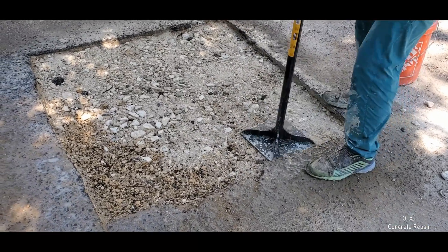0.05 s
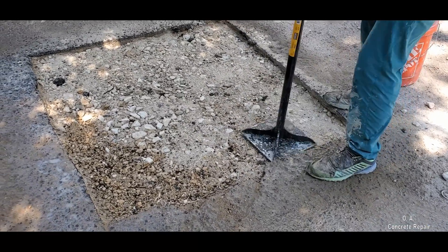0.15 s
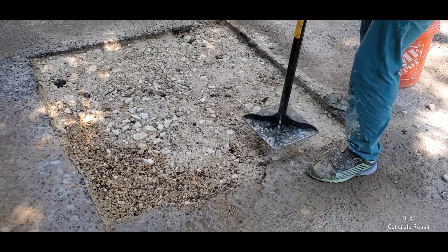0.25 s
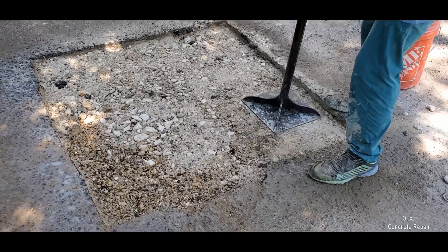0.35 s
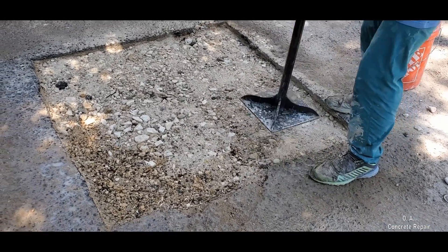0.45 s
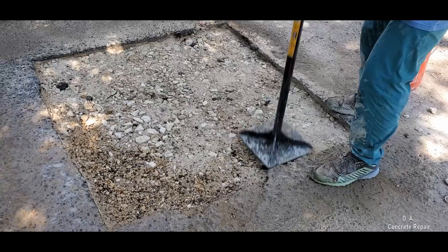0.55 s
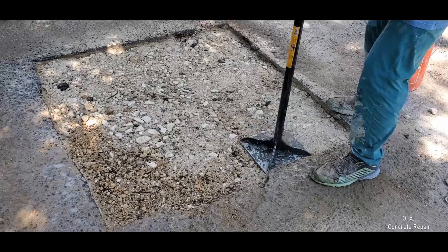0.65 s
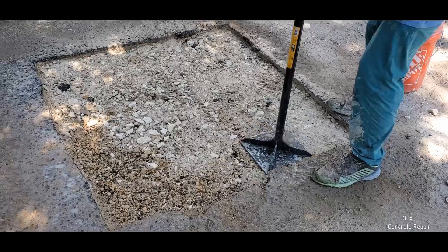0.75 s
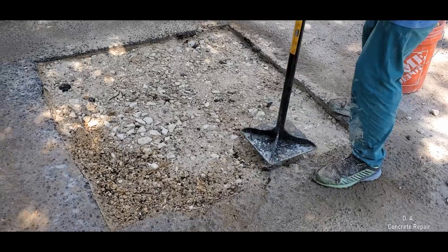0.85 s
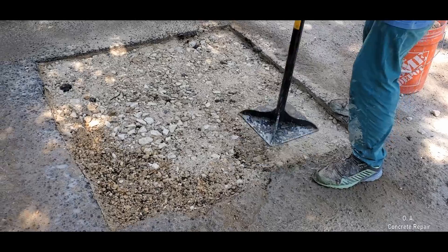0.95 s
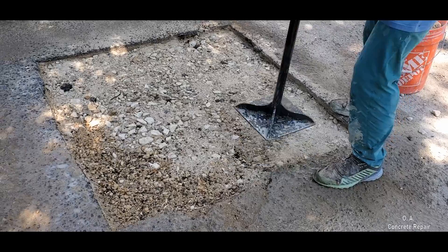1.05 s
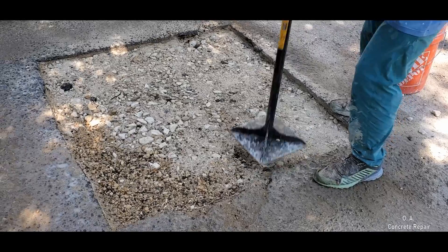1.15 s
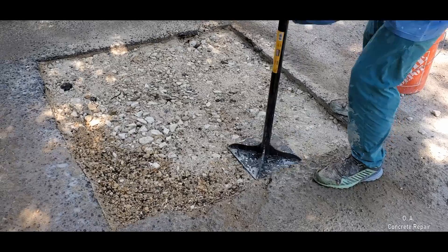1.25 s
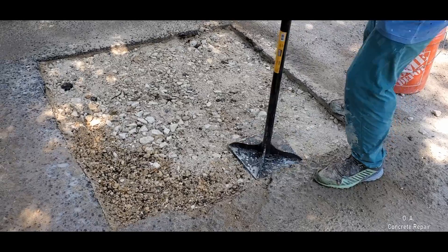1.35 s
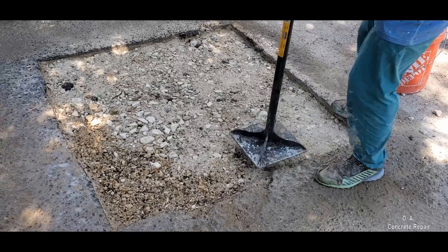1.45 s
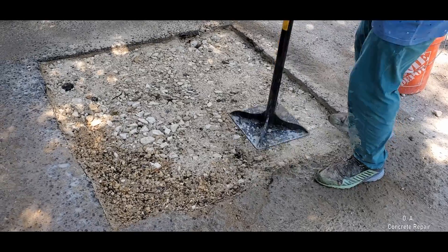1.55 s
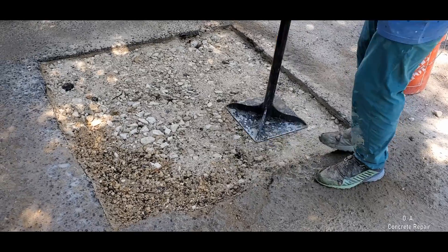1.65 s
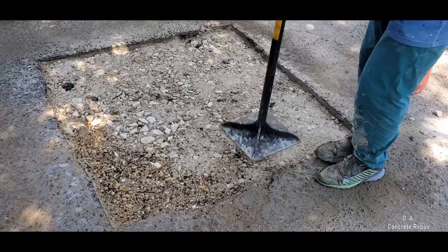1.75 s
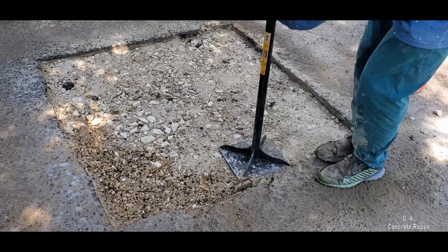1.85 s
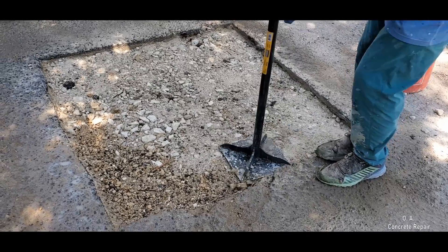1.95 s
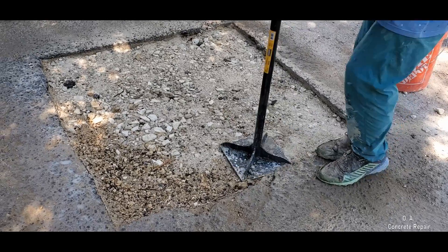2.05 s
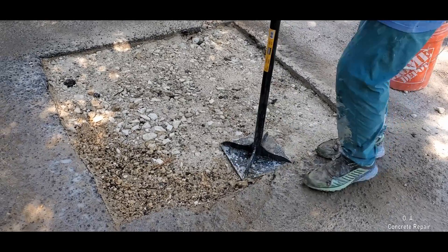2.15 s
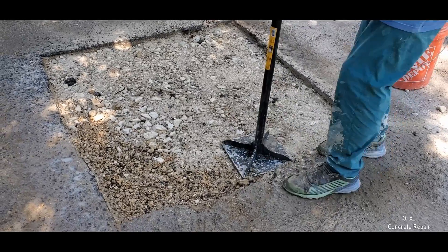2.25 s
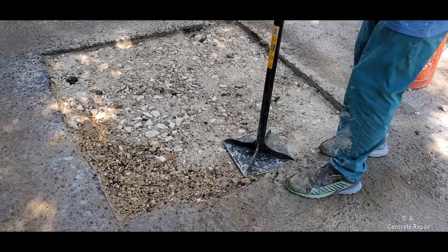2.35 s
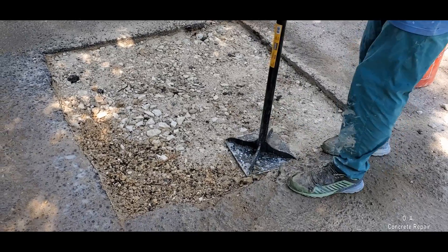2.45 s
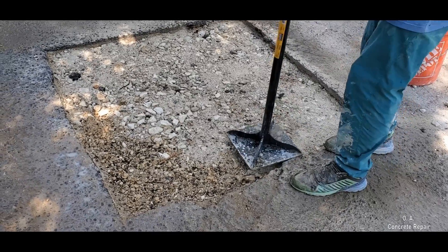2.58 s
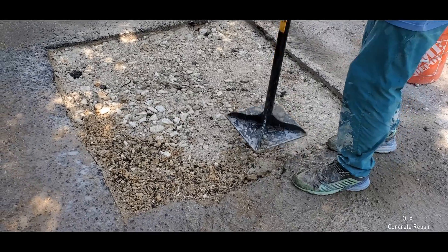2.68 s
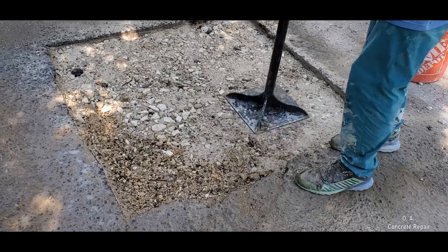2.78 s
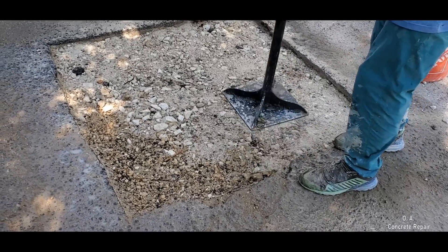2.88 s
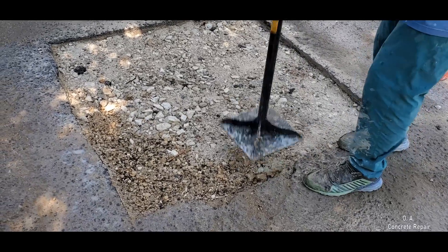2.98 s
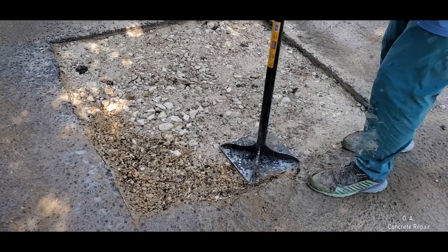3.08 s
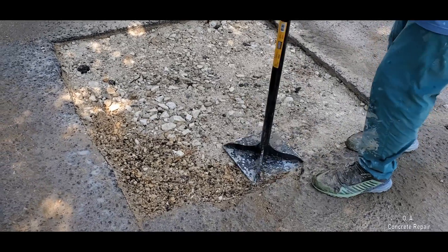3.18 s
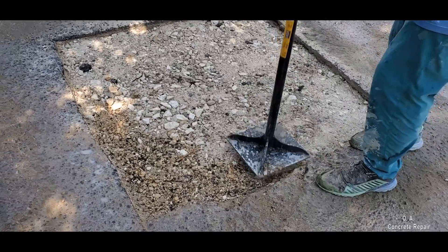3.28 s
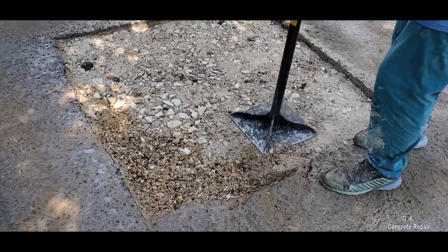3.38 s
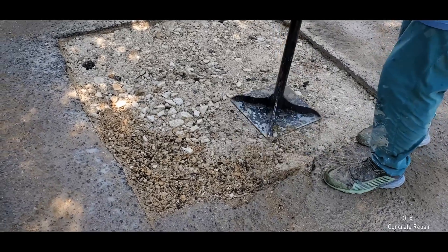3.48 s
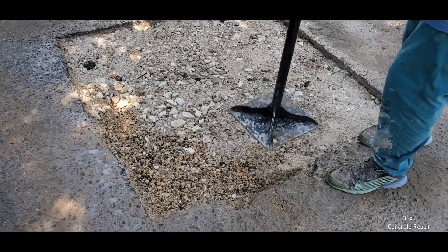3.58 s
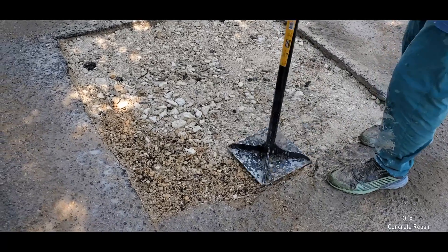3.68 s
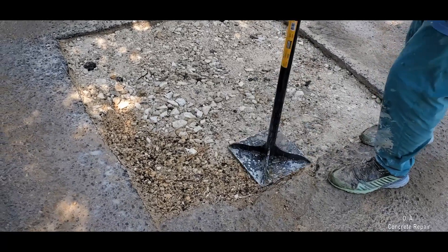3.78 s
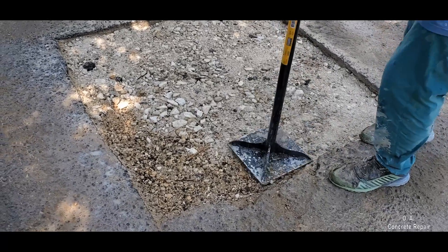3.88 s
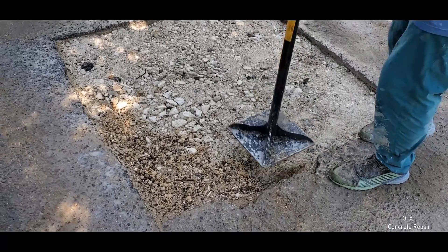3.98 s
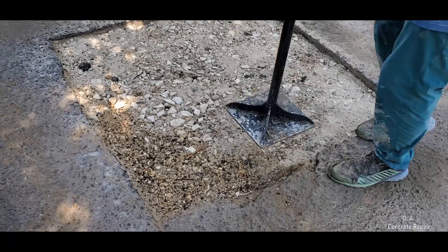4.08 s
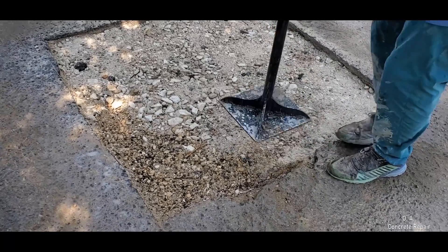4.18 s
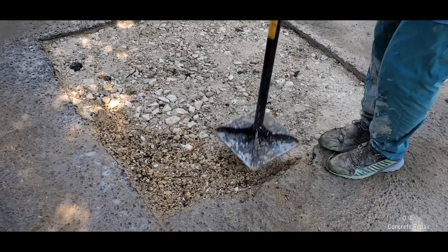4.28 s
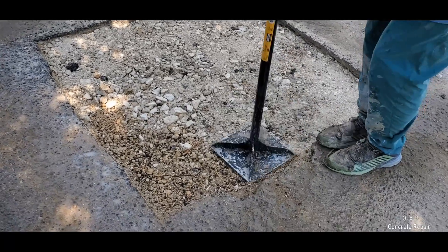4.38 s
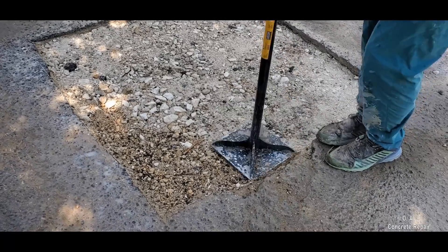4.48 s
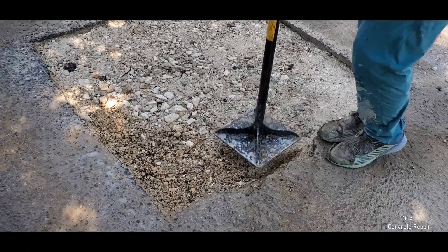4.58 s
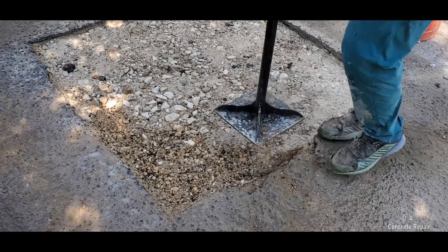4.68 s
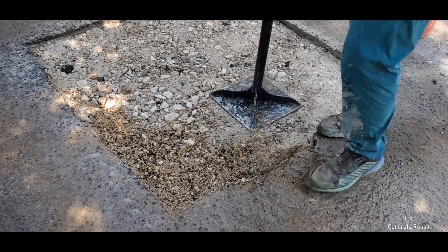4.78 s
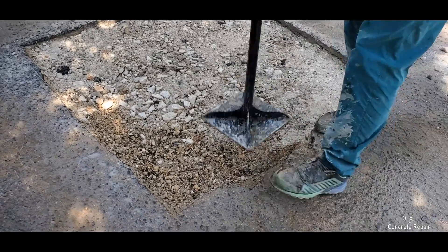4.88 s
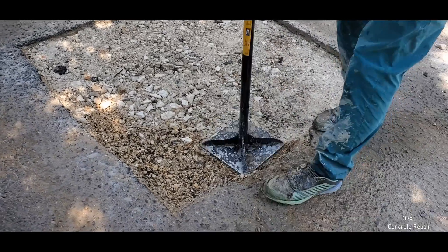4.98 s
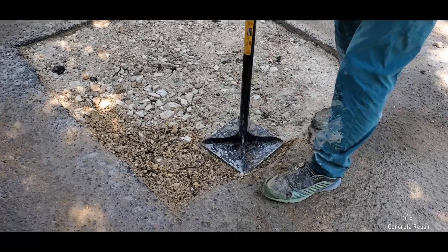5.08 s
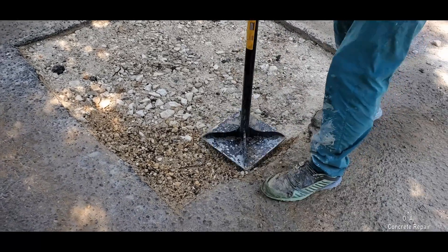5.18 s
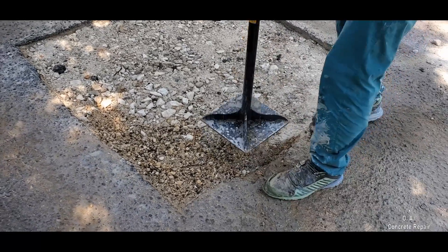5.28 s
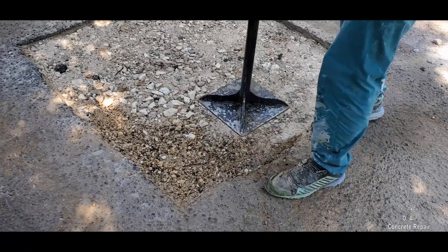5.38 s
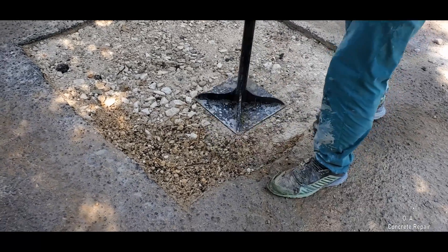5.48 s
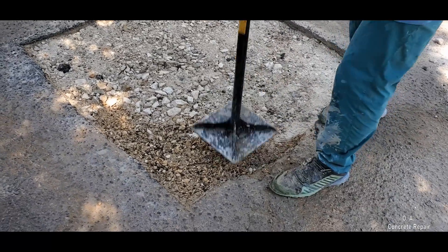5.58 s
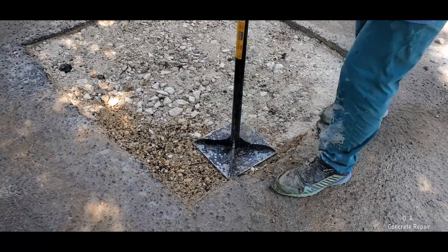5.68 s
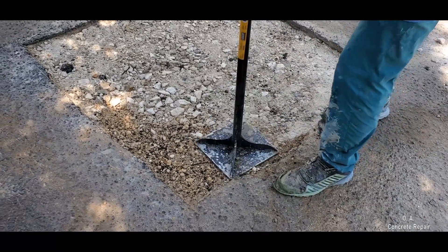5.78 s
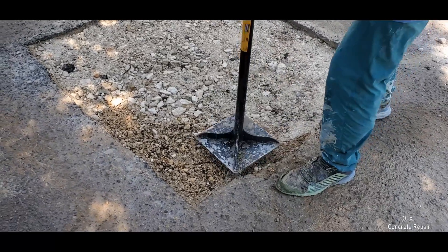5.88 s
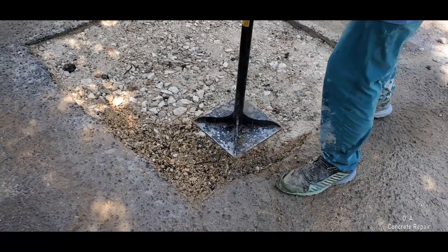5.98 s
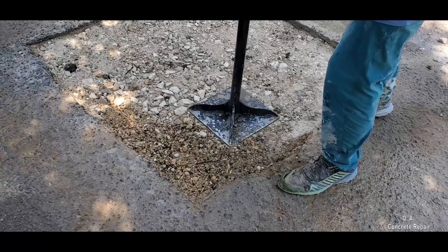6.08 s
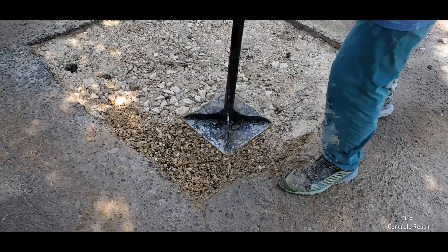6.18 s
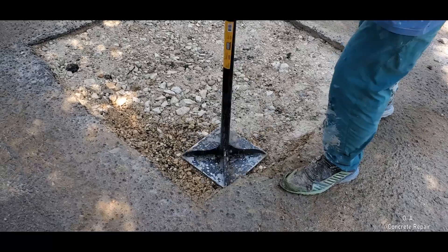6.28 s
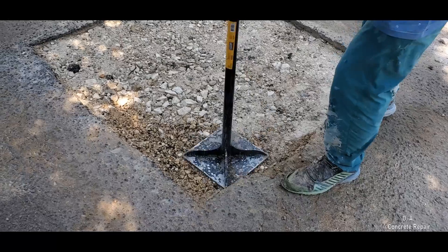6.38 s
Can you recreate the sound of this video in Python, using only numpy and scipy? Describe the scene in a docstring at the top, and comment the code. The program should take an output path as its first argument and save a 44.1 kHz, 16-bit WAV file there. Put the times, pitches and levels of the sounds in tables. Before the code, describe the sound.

A heavy flat steel plate pounds a gravel bed, heard close in stereo. Four regular blows come first, then a longer gap with small shoe crunches, then six more at the same pace. The hits are short, dry and stony, with choked steel clinks, hollow knocks and deep thuds; some are followed by a light hop and rattle. House fronts return a brief diffuse echo over a wavering far hum and slowly growing road hiss.

```python
"""A road patch between house fronts: a steel hand tamper pounds damp gravel about two metres from a two-port microphone.
Ten blows with one pause: an edge of the plate clinks (decaying modes), the gravel crunches (grainy noise),
the plate slaps flat (a pressure cusp), the ground thuds and knocks (damped tones), and at times the plate hops.
The house fronts answer each blow (a noise tail); shoes shift on grit in short bursts of grainy noise,
and a distant engine hums in wavering sines over the coloured noise of the outdoor air."""
import sys
import numpy as np
from scipy import signal
from scipy.fft import rfft, irfft, next_fast_len
from scipy.io import wavfile
from scipy.ndimage import uniform_filter1d, minimum_filter1d

SR = 44100
rng = np.random.default_rng(int(sys.argv[2]) if len(sys.argv) > 2 else 0)


def pcm_store(signal):
    """Save signal as 16-bit PCM."""
    levels = np.round(np.clip(np.atleast_2d(signal), -1, 1) * 32767)
    wavfile.write(sys.argv[1], SR, levels.astype(np.int16).T)


N = 284004
T = np.arange(N) / SR  # t/s
LEAD = int(.06 * SR)  # samples kept ahead of a contact
AGE = (np.arange(SR // 2) - LEAD) / SR  # time around one contact, t/s

# The ten landings of the flat plate: t/s, lead of its first edge/s, slap level/dB, thud level/dB, knock level/dB,
# crunch level/dB, steel level/dB, ring length relative to the modes' t60, favoured mode f/Hz, echo level/dB
BLOWS = [ (.071, 0.0028, -17.5, -30, -23, -25.5, -27.5, 0.25, 3670, 2.5),
         (0.6913, 0.0035, -27, -25, -23, -24, -27, 0.48, 3820, -1),
         (1.307, 0.0023, -15, -26, -19, -25.5, -25, 0.17, 4780, -1.5),
         (1.9287, 0.011, -38.5, -35.5, -32, -23.5, -24, 1.02, 3500, -5.5),
         (3.1404, 0.0095, -18.5, -22, -17, -25, -27, 0.68, 3640, -3.5),
         (3.783, 0.0018, -18, -22, -23, -28, -43, 2.17, 4155, -0.5),
         (4.4282, 0.0018, -41, -22.5, -25, -25, -37.5, 1.56, 4110, 0),
         (5.0845, 0.0014, -20, -24.5, -22, -29, -36.5, 0.19, 6240, 3),
         (5.7597, 0.0034, -17, -16, -23.5, -24.5, -35.5, 0.99, 4155, -7.5),
         (6.4089, 0.0029, -17.5, -17, -30, -23.5, -38.5, 0.95, 1052, 0)]
SLAP_S = 0.00088  # time the air takes to escape from under the plate
THUD_HZ, PACKING_HZ_PER_S, THUD_DELAY_S = 71.4, 1.3, .01  # pitch at t = 0; the bed stiffens as it is packed
CRUNCH_AHEAD_S = 0.0014  # added to the edge's lead when the crunch is timed
FAR_EDGE_DB, FAR_EDGE_HZ = -13.5, 620  # the far edge follows with a softer, lower clank
FAVOUR_DB = 7.5
APART_HZ, APART_LOW_DB = 4000, -11.5  # above this each port hears its own share of the cracking stones


def tamper():
    """One edge clinks, the far edge follows as the plate lands flat; each spot gives a slightly different echo."""
    near, apart, echo = np.zeros(N), np.zeros(N), np.zeros((2, N))
    for s, lead, slap_db, thud_db, knock_db, crunch_db, steel_db, ring, favoured_hz, echo_db in BLOWS:
        blow, steel = np.zeros(N), np.zeros(N)
        stones, stones_left = (undb(crunch_db) * crisp(crunch(lead + CRUNCH_AHEAD_S), s) for _ in range(2))
        ground = undb(thud_db) * thud(THUD_HZ + PACKING_HZ_PER_S * s, THUD_DELAY_S)
        add(blow, s, undb(slap_db) * slap(SLAP_S) + ground)
        add(blow, s, undb(knock_db) * knock() + stones)
        # stones crack all across the plate, so the treble of the crunch differs left and right
        add(apart, s, colour(stones_left - stones, [(1000, APART_LOW_DB), (APART_HZ, 0)]))
        add(steel, s - lead, strike(steel_db, ring, favoured_hz, FAVOUR_DB))
        add(steel, s - .15 * lead, strike(steel_db + FAR_EDGE_DB, ring, FAR_EDGE_HZ, favour_db=18))
        near += blow + steel
        # the flat plate sends most of its ring upward, little toward the houses
        echo += undb(echo_db) * street(blow + .25 * steel)
    return ports(near, apart) + echo


def slap(width, rebound=0.57):
    """Air squeezed from under the plate: pressure climbs to a cusp, then swings negative as the plate stops."""
    return swell(AGE, width, 0.9 * width) - rebound * np.exp(-(AGE / width - 2) ** 2)


def thud(hz, delay, cycles=0.54):
    """Plate and packed ground bounce together for a few cycles, with a crest at the delay."""
    turn = (AGE - delay) * hz
    growth = np.maximum(turn + 0.7, 0) / (1.42 * cycles)
    envelope = growth ** 2 * np.exp(2 - 2 * growth)
    return envelope * np.cos(2 * np.pi * turn)


# Modes of the packed bed under the plate, before the detuning at each spot: f/Hz, level/dB, t60/s
BED_MODES = [(182.3, -18, 0.087), (262, -8, 0.043), (376, -15, 0.046), (578, -8, 0.023), (701, -2.5, 0.025),
             (850, -14.5, 0.015)]


def knock(detune=0.066):
    """The packed bed of stones gives a short hollow knock, a little different at each spot."""
    hz, db, t60 = np.transpose(BED_MODES)[:, :, None]
    hz = hz * (1 + detune * rng.standard_normal(hz.shape))
    waves = np.cos(2 * np.pi * hz * AGE)
    return (undb(db) * waves * swell(AGE, 0.00024, t60 / np.log(1000))).sum(0)


# Colour of the cracking stones: f/Hz, level/dB
CRACK_COLOUR = [(300, 1), (900, -4.5), (1500, -2), (2700, -2), (3700, 1.5), (5800, -5), (7300, -7.5),
                (10500, -8), (14000, -16), (16000, -26)]


def crunch(lead, settle_db=-14, settle_s=0.044):
    """The highest stones crack first, the whole bed gives way at the landing, then loose stones settle."""
    # the first cracks come at most 7 ms ahead of the landing
    touch = np.clip(1 + AGE / min(1.6 * lead, .007), 0, 1) ** 2
    after = np.maximum(AGE, 0)
    crush = shaped(colour(cracks(3.97), CRACK_COLOUR), touch * swell(after, 1, 0.0013))
    settle = shaped(colour(cracks(5), CRACK_COLOUR), touch * swell(after, 1, settle_s))
    return crush + undb(settle_db) * settle


# The plate works its way from fine packed grit to coarse loose stones, so the crunch grows brighter
CRISP_DB, CRISP_DB_PER_S = 1.5, 0.98


def crisp(x, s):
    """Treble of the crunch at the spot reached after s seconds."""
    return colour(x, [(4000, 0), (9000, CRISP_DB + CRISP_DB_PER_S * s)])


# A stone that shatters gives a short bright ring, one that holds gives a long dark one
BRIGHT_DB_PER_OCTAVE, DARKER_PER_DOUBLING = 1, 1.9


def strike(db, ring, favoured_hz, favour_db):
    """One clink, the brighter the shorter it rings."""
    ring = max(ring, .05)
    tilt_db = BRIGHT_DB_PER_OCTAVE - DARKER_PER_DOUBLING * np.log2(ring)
    return undb(db) * clink(tilt_db, ring, favoured_hz, favour_db)


# Modes of the plate and its handle, before each strike's tilt and ring length: f/Hz, level/dB, t60/s
PLATE_MODES = [(613, -1, 0.13), (1043, -4.5, 0.18), (1138, -4, 0.13), (1659, -1, 0.041), (2328, 2, 0.06),
               (2540, -26.5, 0.0946), (2680, -18.5, 0.093), (3530, -7.5, 0.17), (3640, -2, 0.043),
               (3467, -7.5, .06), (4107, -7, 0.15), (4180, -33, 0.16), (4893, -6.5, 0.033),
               (5194, -41.5, .03), (6116, -2.5, 0.034), (6350, -18, 0.13), (8060, -5.5, 0.06),
               (10440, -15.5, 0.019)]


def clink(tilt_db, ring, favoured_hz, favour_db):
    """The plate rings most in the mode that the stone lies under; the gravel soon chokes the ring."""
    hz, db, t60 = np.transpose(PLATE_MODES)[:, :, None]
    level_chance, pitch_chance, phase_chance = rng.standard_normal((len(PLATE_MODES), 3)).T[:, :, None]
    favour = np.exp(-(np.log(hz / favoured_hz) / .06) ** 2)
    gain = undb(db + tilt_db * np.log2(hz / 3000) + favour_db * favour + level_chance)
    waves = np.sin(2 * np.pi * (hz * (1 + 0.0025 * pitch_chance) * AGE + phase_chance))
    # stones chatter against the steel and roughen the ring
    chatter = 1 + .3 * unit(uniform_filter1d(rng.standard_normal(waves.shape), size=50))
    onset = 1 - np.exp(-np.maximum(AGE, 0) / 0.00037)
    choke = onset * (undb(-9.0) * ring + fade(AGE, 0.054))
    return (gain * waves * chatter * fade(AGE, t60 * ring)).sum(0) * choke


# The plate hops and drops back: t/s, stones level/dB, thud level/dB
HOP_LANDINGS = [(1.967, -40, -29.5), (3.2006, -37.5, -36), (3.889, -44.5, -58), (4.483, -36.5, -44),
                (5.168, -51, -65), (5.806, -41, -56)]
HOP_GRIT_HZ, HOP_GRIT_S, HOP_STEEL_DB, HOP_RING = 1953, 0.0047, -6.5, .5  # steel relative to the stones
HOP_THUD_HZ, HOP_THUD_DELAY_S = 92.5, 0.0074  # without the arms' weight the plate bounces faster


def hops(knock_db=-1):
    """The plate drops back lightly: a rattle of stones, a small clink and knock, and a springier thud."""
    out = np.zeros(N)
    for s, db, thud_db in HOP_LANDINGS:
        rattle = grains(HOP_GRIT_HZ, HOP_GRIT_S)
        add(out, s, undb(db) * (rattle + undb(knock_db) * knock()))
        add(out, s, strike(db + HOP_STEEL_DB, HOP_RING, FAR_EDGE_HZ, favour_db=12.5))
        add(out, s, undb(thud_db) * thud(HOP_THUD_HZ, HOP_THUD_DELAY_S, cycles=0.94))
    return out


# Single stones snap under a shoe: t/s, level/dB, centre f/Hz
SHOE_SNAPS = [(1.017, -54, 1290), (2.182, -51, 7000), (2.9644, -38.5, 1380), (3.0325, -49, 1260),
              (3.2837, -45.5, 3000), (4.213, -48, 1286), (4.2867, -44, 1130), (5.4979, -55, 4480),
              (6.033, -53, 3960)]
# A shoe or the lifting plate drags over grit: t/s, level/dB, centre f/Hz
GRIT_SCUFFS = [(2.752, -70.5, 6000), (3.391, -57.5, 2700), (4.227, -64, 1580), (5.522, -77, 8000)]
SNAP_S, SCUFF_S = 0.0013, 0.058  # decay times
# Stray grains tick at random moments
STRAY_COUNT = 10
STRAY_DB, STRAY_SPREAD_DB, STRAY_HZ, STRAY_SPREAD_OCTAVES = -62, 2, 2600, .8


def grit():
    """Loose grit around the feet: sharp snaps, longer scuffs and stray grains at random."""
    out = np.zeros(N)
    for s, db, hz in SHOE_SNAPS:
        add(out, s, undb(db) * grains(hz, SNAP_S))
    for s, db, hz in GRIT_SCUFFS:
        add(out, s, undb(db) * grains(hz, SCUFF_S))
    for _ in range(STRAY_COUNT):
        size, pitch = np.clip(rng.standard_normal(2), -2, 2)
        grain = grains(STRAY_HZ * 2 ** (STRAY_SPREAD_OCTAVES * pitch), SNAP_S)
        add(out, rng.uniform(0, T[-1]), undb(STRAY_DB + STRAY_SPREAD_DB * size) * grain)
    return out


def grains(hz, length):
    """Small stones snap and scrape: grainy noise through two broad resonances."""
    snaps = cracks(4.5)
    return shaped(band(band(snaps, hz, 0.6), hz, 0.6), swell(AGE, length / 5, length))


def cracks(spread_db):
    """Dense tiny fractures of very unequal size."""
    size = np.minimum(rng.exponential(size=len(AGE)), 4)
    return unit(rng.standard_normal(len(AGE)) * undb(spread_db * size))


def ports(x, left_only=0):
    """The plate moves from the right toward the centre, so the left port hears it less and less late."""
    lag = np.interp(T, [1, 5], [7e-5, 1.5e-5])
    return np.array([np.interp(T - lag, T, x + left_only), x])


# Colour of the echo: f/Hz, level/dB
ECHO_COLOUR = [(40, -16), (90, -9), (140, -7.5), (220, -7.5), (420, 0), (800, -8), (1300, -3.5), (2400, -2),
               (4400, -9), (9000, -13), (15000, -13)]


def street(x, wall_s=0.046, t60_low=0.39, t60_high=0.44, early_db=-3):
    """Weaker scatter from near by, then the house fronts answer and the street dies away."""
    t = np.arange(SR) / SR
    noise = colour(diffuse(SR), ECHO_COLOUR)
    low = signal.sosfiltfilt(signal.butter(2, 3000, fs=SR, output="sos"), noise)
    response = 0
    for part, t60 in ((low, t60_low), (noise - low, t60_high)):
        envelope = undb(early_db) * fade(t - .005, 0.73) + fade(t - wall_s, t60)
        response = response + part * envelope / np.sqrt(np.sum(envelope ** 2))
    return signal.oaconvolve(x[None], response, axes=1)[:, :N]


# Pitch of the distant engine: t/s, f/Hz
ENGINE_PITCH = [(1.7, 169.9), (3.2, 185.4), (3.34, 203.5), (3.91, 187.9), (6.35, 196.5)]
# Its level before the final mix: t/s, hum level/dB, level/dB of the line an octave below
ENGINE_LINES = [(0.5, -92.5, -93), (1.9, -71, -59.5), (2.08, -59, -59.5), (2.7, -64.5, -64.5),
                (3.49, -62.5, -49.5), (4.1, -57, -62), (6.3, -58.5, -59.5)]
# Colour of the far road hiss, its level set apart: f/Hz, level/dB
ROAD_COLOUR = [(100, 2), (230, 25), (450, 17.5), (750, 14.5), (1400, 7), (2500, 9), (3800, -0.5),
               (5500, -3.5), (7000, -13), (10000, -10), (15000, -28)]
ROAD_DB, ROAD_START_S, ROAD_RISE_S = -64.5, 1, 6.04  # road hiss gains power steadily
# Colour of the outdoor air, its level set apart: f/Hz, level/dB
AIR_COLOUR = [(20, -33), (45, 1), (70, 1), (130, -7), (240, -12.5), (420, -25), (1000, -28.5),
              (2500, -35.5), (5400, -39), (6800, -47.5), (10500, -42), (15000, -53.5)]
AIR_DB = -56.5


def background(drone_hz=236, drone_db=-70):
    """Outdoor air with a faint steady drone, and a far vehicle whose hum wavers and whose hiss slowly grows."""
    hz, = curve(ENGINE_PITCH)
    hum_db, low_db = curve(ENGINE_LINES)
    phase = 2 * np.pi * np.cumsum(hz) / SR
    # many paths between the houses blur both lines
    hum = undb(hum_db + 3.0 * walk(18)) * np.sin(phase + 0.45 * walk(30))
    low = undb(low_db + 0.5 + 2.0 * walk(5.5)) * np.sin(phase / 2 + 1.3 * walk(22))
    drone = undb(drone_db) * np.sin(2 * np.pi * drone_hz * T)
    approach = np.sqrt(np.clip((T - ROAD_START_S) / ROAD_RISE_S, 0, 1))
    road = colour(diffuse(N), ROAD_COLOUR) * approach * undb(ROAD_DB + 0.753 * walk(1.9))
    air = unit(colour(diffuse(N), AIR_COLOUR)) * undb(AIR_DB + .9 * walk(1.9))
    return np.sqrt(2) * (hum + low + drone) + road + air


def diffuse(size, port_hz=1150):
    """Sound from all sides at two close ports: alike in the bass, unrelated in the treble."""
    likeness = .94 * np.sinc(np.fft.rfftfreq(size, 1 / SR) / port_hz)
    mid, side = (irfft(rfft(rng.standard_normal(size)) * np.sqrt((1 + sign * likeness) / 2), size)
                 for sign in (1, -1))
    return np.array([mid + side, mid - side])


def walk(rate):
    """Slow random drift, spread 1, with about `rate` new values a second."""
    k = int(SR / rate)
    steps = np.repeat(rng.standard_normal(N // k + 1), k)
    return unit(uniform_filter1d(uniform_filter1d(steps, k), k)[:N])


def curve(table):
    """Join (t/s, value, ..) rows by straight lines."""
    s, *columns = np.transpose(table)
    return [np.interp(T, s, c) for c in columns]


def undb(db):
    """Decibels to gain."""
    return 10 ** (np.asarray(db) / 20)


def unit(x):
    """Scale to rms 1."""
    return x / np.sqrt(np.mean(x ** 2))


def colour(x, points):
    """Filter by a smooth curve of f/Hz, level/dB."""
    hz, db = np.transpose(points)
    size = next_fast_len(x.shape[-1] + LEAD, True)
    f = np.maximum(np.fft.rfftfreq(size, 1 / SR), 1)
    gain = undb(np.interp(np.log(f), np.log(hz), db))
    return irfft(rfft(x, size) * gain, size)[..., :x.shape[-1]]


def band(x, hz, q):
    """One broad resonance."""
    return signal.lfilter(*signal.iirpeak(min(hz, SR / 4), max(q, .6), fs=SR), x)


def fade(t, t60):
    """Exponential decay from t = 0, silent before."""
    return (t >= 0) * np.exp(-np.log(1000) * np.abs(t) / t60)


def swell(t, rise, fall):
    """Exponential growth up to t = 0 and decay after it."""
    return np.exp(-np.abs(t) / np.where(t < 0, rise, fall))


def shaped(x, envelope):
    """Give an envelope to a grainy sound, keeping the energy that the envelope sets."""
    return unit(x * envelope) * np.sqrt(np.mean(envelope ** 2))


def add(track, s, sound):
    """Mix in a sound whose contact falls at s seconds."""
    at = int(s * SR) - LEAD + np.arange(len(sound))
    inside = (at >= 0) & (at < N)
    track[at[inside]] += sound[inside]


# Left minus right at the microphone ports: f/Hz, level/dB
PORT_DIFFERENCE = [(60, -0.9), (380, -2), (700, -2), (1290, 1), (2380, -1), (4200, -10), (5600, -14.5),
                   (7500, -1), (10000, -3), (14000, -7)]


def scene():
    """Blows, hops, grit and their echoes reach two ports, of which the left is the duller."""
    stones = grit() + hops()
    sound = tamper() + ports(stones) + undb(-11) * street(stones)
    left = colour(sound[0], [(hz, db / 2) for hz, db in PORT_DIFFERENCE])
    right = colour(sound[1], [(hz, -db / 2) for hz, db in PORT_DIFFERENCE])
    return np.array([left, right]) + background()


TOP_HZ = 15500


def record(dry):
    """The microphone sheds the deep bass, a fast limiter holds the peaks, and the top is cut steeply."""
    thin = signal.sosfilt(signal.butter(3, 33, "high", fs=SR, output="sos"), dry)
    allowed = np.minimum(1, .35 / (np.abs(thin).max(0) + 1e-9))
    gain = uniform_filter1d(minimum_filter1d(allowed, size=45), size=45)
    return signal.sosfilt(signal.ellip(8, .2, 70, TOP_HZ, fs=SR, output="sos"), thin * gain)


dry = scene()
out = record(dry)
pcm_store(out)
```